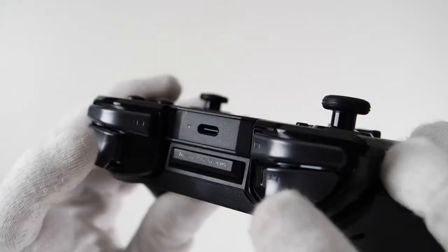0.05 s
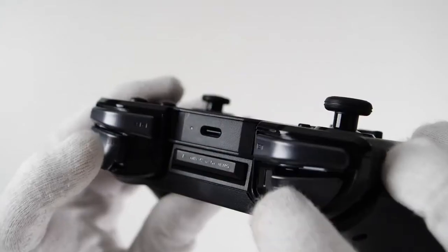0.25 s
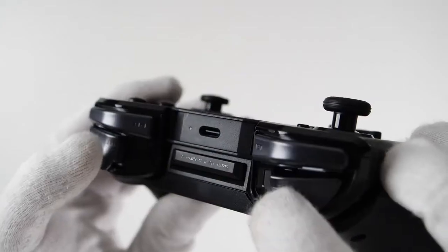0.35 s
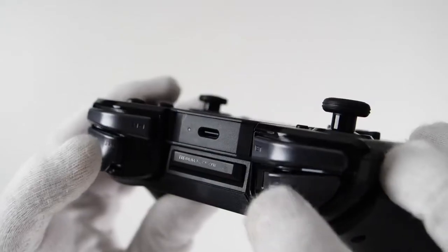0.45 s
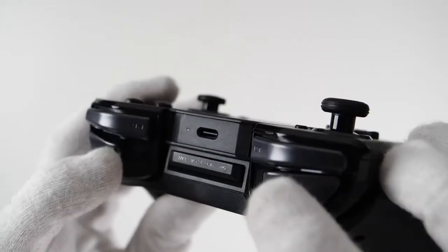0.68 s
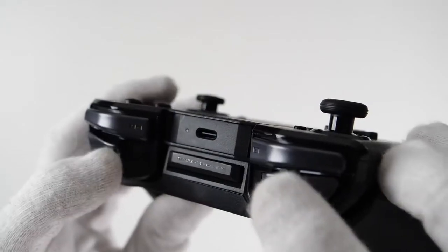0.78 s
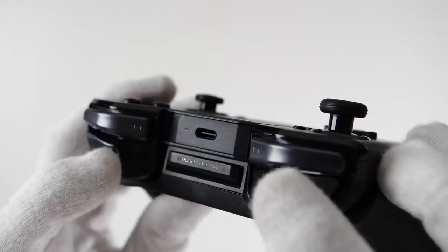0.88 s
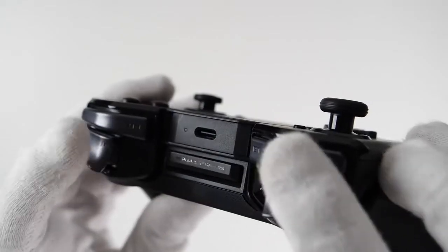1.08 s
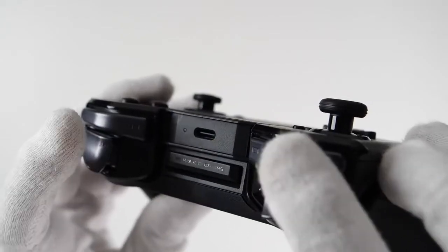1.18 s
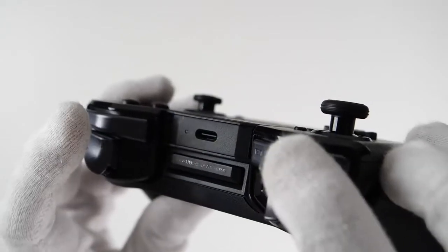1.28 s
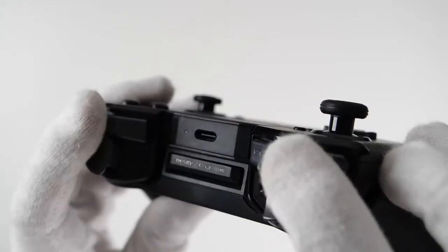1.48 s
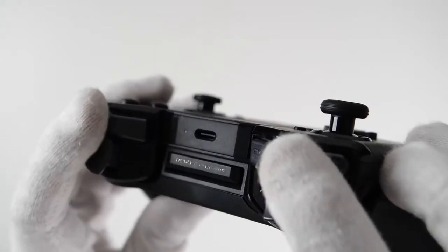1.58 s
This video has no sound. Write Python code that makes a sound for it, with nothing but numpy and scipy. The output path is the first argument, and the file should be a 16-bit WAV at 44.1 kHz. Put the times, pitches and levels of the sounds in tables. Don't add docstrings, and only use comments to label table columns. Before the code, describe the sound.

Crisp plastic button clicks on a handheld controller, press and release, over faint low hum and hiss

```python
import sys
import numpy as np
from scipy import signal
from scipy.fft import rfft, irfft
from scipy.io import wavfile

SR = 44100
rng = np.random.default_rng(int(sys.argv[2]) if len(sys.argv) > 2 else 0)


def to_wav(s):
    ch = np.atleast_2d(s).T
    pcm = np.round(np.clip(ch, -1, 1) * 32767)
    wavfile.write(sys.argv[1], SR, pcm.astype(np.int16))


def level_to_linear(level):
    exponent = np.asarray(level, float) / 20
    return 10 ** exponent


N = 72765

# frequency in Hz, width in Hz, level in dB
FIRST_RELEASE = [(963, 180, -10), (1990, 170, -3), (2550, 50, -13), (3760, 304, -1.5), (6370, 310, -10.5),
                 (7760, 87, -51), (8070, 160, -15), (9240, 245, -8.5), (10200, 170, -41), (11200, 204, -42)]
# frequency in Hz, width in Hz, level in dB
SECOND_PRESS = [(1066, 56, -8.5), (1775, 250, 1.5), (2938, 190, 1), (3700, 49, -5), (3946, 68, -3),
                (5290, 190, -5), (6070, 91, -11.5), (6440, 117, -16), (8196, 73, -21), (10640, 150, -12)]
# frequency in Hz, width in Hz, level in dB
AFTER_RING = [(2100, 34, -1), (3674, 300, -9)]
# frequency in Hz, width in Hz, level in dB
SCUFF = [(1000, 200, -1.5), (1280, 150, 0.5), (2000, 295, -1), (3700, 280, -7)]


def rms_one(x):
    return x / np.sqrt(np.mean(x ** 2) + 1e-20)


def at_hz(points, hz):
    points = np.array(points)
    return np.interp(np.log(hz), np.log(points[:, 0]), points[:, 1])


def butter(x, order, hz, kind="low"):
    return signal.sosfilt(signal.butter(order, hz, kind, fs=SR, output="sos"), x)


def ring(x, hz, width_hz):
    r, w = np.exp(-np.pi * width_hz / SR), 2 * np.pi * hz / SR
    return signal.lfilter([0, np.sin(w)], [1, -2 * r * np.cos(w), r * r], x)


def drift(rate_hz):
    r = np.exp(-2 * np.pi * rate_hz / SR)
    wander = signal.lfilter([1], [1, -2 * r, r * r], rng.standard_normal(N + SR))
    return rms_one(wander[SR:])


def hiss():
    # frequency in Hz, level in dB per Hz
    spectrum = [(15, -63), (25, -11.5), (117, -5), (175, -13.5), (301, -15.5), (326, -18.5), (2550, -30),
                (11000, -40), (16000, -54.5)]
    # frequency in Hz, side re mid in dB
    side_curve = [(60, -30.5), (110, -32), (200, -14.5), (380, -12), (700, -8), (1290, -6), (2380, -5),
                  (4400, -1.5), (8120, -2.5), (15000, 2)]
    hz = np.maximum(np.fft.rfftfreq(N, 1 / SR), 1)
    fan_db = 4.5 * np.exp(-((hz - 2430) / 89) ** 2)
    colour = level_to_linear(at_hz(spectrum, hz) + fan_db) * (hz > 18)
    mid, side = rfft(rng.standard_normal((2, N))) * colour
    side = side * level_to_linear(at_hz(side_curve, hz) - 0.5)
    return level_to_linear(-54.5) * rms_one(irfft(mid + side * [[1], [-1]], N))


def hum():
    # frequency in Hz, level in dB rms, waver from 0 to 1
    tones = [(29.9, -68.5, 0.5), (48.8, -55.5, 0), (113.7, -59.5, 0.6), (149.6, -67.5, 0.1),
             (301, -68, 0.7)]
    t = np.arange(N) / SR
    out = np.zeros(N)
    for hz, db, waver in tones:
        level = level_to_linear(db) * np.sqrt(2) * (1 + waver * drift(2.1))
        out += level * np.sin(2 * np.pi * hz * t + 2 * waver * drift(3.4))
    return out


def room(x):
    # frequency in Hz, decay time t60 in seconds, colour in dB, side re mid in dB
    walls = [(596, 0.16, -5, -7), (1100, 0.086, 3, -23), (1570, 0.19, 1.5, -21.5), (2100, 0.16, -1, -18.5),
             (3450, .2, -1.5, -18), (5570, 0.17, -1, -14), (8000, 0.14, 0, -3.5), (12000, 0.106, -2.5, 0.5)]
    walls = np.array(walls)
    level_db, onset_s = -9, 0.002
    t = np.arange(SR // 2) / SR
    edges = 350 * 2 ** np.arange(0, 6, 1 / 3)
    white = rng.standard_normal((2, 2, len(t)))
    answer = np.zeros((2, len(t)))
    for k, (low, high) in enumerate(zip(edges, edges[1:])):
        band = butter(white[k % 2], 2, [low, high], "band")
        t60, db, side_db = (at_hz(walls[:, [0, c]], np.sqrt(low * high)) for c in (1, 2, 3))
        answer += band * level_to_linear(db - 60 * t / t60) * [[1], [level_to_linear(side_db)]]
    answer *= 1 - np.exp(-(t / onset_s) ** 2)
    answer /= np.linalg.norm(answer[0])
    mid, side = (signal.fftconvolve(x, a)[:N] for a in answer)
    return level_to_linear(level_db) * (mid + side * [[1], [-1]])


def spring():
    tick = (0.5495, -43, 14000, 2500)
    start_s, db, hz, width_hz = tick
    t = np.arange(N) / SR - start_s
    scrape = rng.standard_normal(N) * (t > 0) * np.exp(-np.abs(t) / 0.0027)
    chatter = ring(scrape, hz, width_hz)
    return level_to_linear(db) * chatter / np.abs(chatter).max()


def grip_shake(start_s):
    # frequency in Hz, width in Hz, level in dB
    grip_modes = [(238, 35.3, -47.5), (455, 20, -49.5)]
    push = 1. * (np.arange(N + SR) == int(start_s * SR))
    return sum(level_to_linear(db) * ring(push, hz, width_hz) for hz, width_hz, db in grip_modes)


def contact_train(t, rebound_s, bottom_s, bottom_db):
    rebounds_per_s, later_hz = 2500, 3456
    struck = rng.random(len(t)) < rebounds_per_s / SR
    hits = struck * rng.standard_normal(len(t)) * 0.62 * np.exp(-(t / rebound_s) ** 2)
    hits[int(bottom_s * SR)] = -level_to_linear(bottom_db)
    return butter(hits, 2, later_hz) + (t == 0)


def ring_shell(hits, shell, blur):
    widen, loss = 1.16, 0.01
    body = np.zeros(len(hits))
    for k, (hz, width_hz, db) in enumerate(shell):
        mode = ring(hits, hz, blur * (widen * width_hz + loss * hz))
        body += (-1) ** k * level_to_linear(db) * np.sqrt(blur) * mode
    return body


def snap(shell, mute_hz, rebound_s, bottom_s, bottom_db, crack_db, thud_db):
    t = np.arange(SR // 10) / SR
    hits = contact_train(t, rebound_s, bottom_s, bottom_db)
    body = np.array([ring_shell(hits, shell, blur) for blur in (1, 3.0)])
    body = butter(body, 6, mute_hz, "high")
    crack = butter(rng.standard_normal(len(t)) * np.exp(-t / 0.00053), 2, 3000, "high")
    thud = butter(ring(1. * (t == 0), 540, 600), 2, 270, "high")
    whole = body / np.abs(body[0]).max()
    whole = whole + level_to_linear(crack_db) * crack / np.abs(crack).max()
    whole = whole + level_to_linear(thud_db) * thud * [[1], [0]]
    return butter(whole, 3, 10900)


def touches():
    # start in seconds, peak in dB, crack re peak in dB, shell resonances
    touch_table = [
        (0.190, -39, -36, SCUFF),
        (0.5485, -39.5, -17.5, FIRST_RELEASE),
        (0.584, -46, -30, AFTER_RING),
        (0.601, -57.5, -30, AFTER_RING),
        (0.728, -48.5, -27.5, SCUFF),
        (1.582, -50, -14, SECOND_PRESS),
    ]
    out = np.zeros((2, N + SR))
    for start_s, db, crack_db, shell in touch_table:
        touch = snap(shell, mute_hz=806, rebound_s=0.011, bottom_s=0.003, bottom_db=3.0,
                     crack_db=crack_db, thud_db=-38)
        i = int(start_s * SR)
        out[:, i:i + SR // 10] += level_to_linear(db) * touch
    return out[:, :N]


def snaps():
    # start in seconds, peak in dB, crack re peak in dB, rebound time in seconds
    snap_table = [
        (0.2179, -5, -6.5, 0.0044),
        (0.5560, -24.5, -5, 0.0052),
        (0.7669, -8, -6.5, 0.004),
        (1.0960, -13.5, -5, 0.0032),
        (1.3316, -20.5, -9, 0.0027),
    ]
    # frequency in Hz, width in Hz, level in dB
    first_press = [(971, 73, -14.5), (1030, 140, -9.5), (1330, 218, -4), (1570, 140, -4.5), (1913, 180, -1),
                   (2697, 85, -6), (2653, 120, -8), (3630, 123, -5), (4180, 81, -7.5), (4813, 50, -14.5),
                   (5475, 110, -8.5), (6324, 200, -8.5), (7730, 309, -14), (9520, 250, -18)]
    # frequency in Hz, width in Hz, level in dB
    second_release = [(1104, 130, -14.5), (1420, 82, -1), (1650, 98, -4.5), (1882, 44, -6.5),
                      (2391, 81, -13.5), (2740, 80, -19), (2960, 64, -19), (3720, 160, -11.5),
                      (5370, 110, -7), (6240, 380, -7.5), (8540, 230, -18)]
    # frequency in Hz, width in Hz, level in dB
    third_press = [(1013, 99, -7.5), (1350, 44, -4.5), (1955, 150, -3.5), (2483, 92, -5.5),
                   (3310, 400, -9.5), (3950, 200, -13), (4380, 130, -10.5), (5940, 220, -11.5),
                   (6720, 140, -11.5), (8450, 110, -18)]
    shells = [first_press, FIRST_RELEASE, SECOND_PRESS, second_release, third_press]
    # delay in seconds, level re first contact in dB
    bottoms = [(.0023, -5), (0.0073, -4.5), (.001, -1), (0.0021765, -0.5), (.0035, -1)]
    thuds_db = [-59, -10, -22, -21, -4.5]
    # level in dB, dull above in Hz
    past_hands = [(3, 3600), (-3, 11000), (-1.5, 11000), (0, 4300), (-0.5, 5900)]
    # shell mute below in Hz, lag between the microphone ports in microseconds
    facing = [(857, 8.5), (740, -13), (760, 0), (710, 6), (740, 2)]
    out = np.zeros((3, N + SR))
    rows = zip(snap_table, shells, bottoms, thuds_db, past_hands, facing)
    for event, shell, bottom, thud_db, (past_db, past_hz), (mute_hz, lag_us) in rows:
        start_s, db, crack_db, rebound_s = event
        near, around = level_to_linear(db) * snap(shell, mute_hz, rebound_s, *bottom, crack_db, thud_db)
        around = level_to_linear(past_db) * signal.lfilter(*signal.butter(1, past_hz, fs=SR), around)
        lagged = np.gradient(near) * lag_us * SR / 2e6
        i = int(start_s * SR)
        out[:, i:i + SR // 10] += [near, around, lagged]
    out[0] += grip_shake(snap_table[0][0])
    return out[:, :N]


def scene():
    near, around, lagged = snaps()
    touch_near, touch_around = touches()
    tones = hum()
    side = lagged + level_to_linear(-25) * np.roll(tones, SR // 7)
    centre = near + touch_near + spring() + tones
    return centre + room(around + touch_around) + side * [[1], [-1]] + hiss()


def low_pass(x):
    return signal.sosfilt(signal.butter(12, 16510, fs=SR, output="sos"), x)


def record(dry):
    return low_pass(dry)


dry = scene()
out = record(dry)
to_wav(out)
```